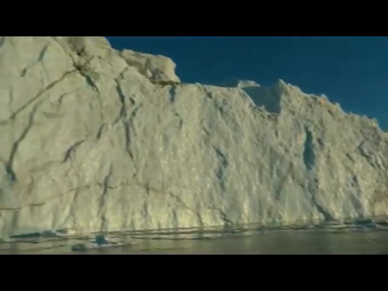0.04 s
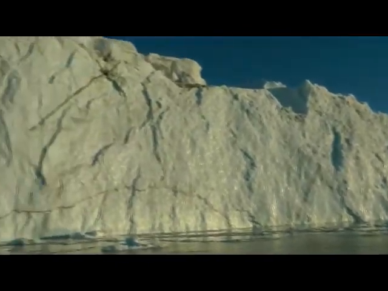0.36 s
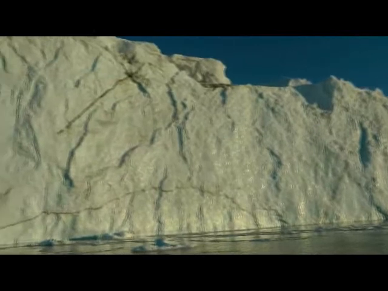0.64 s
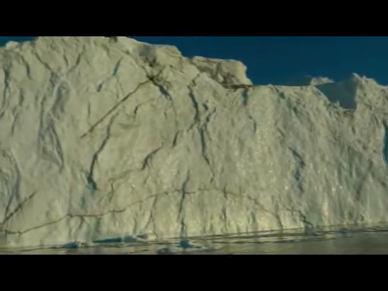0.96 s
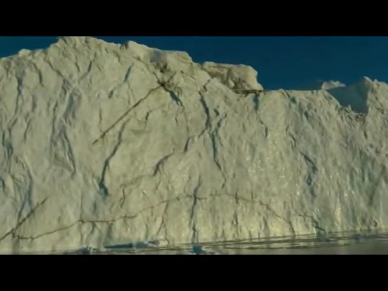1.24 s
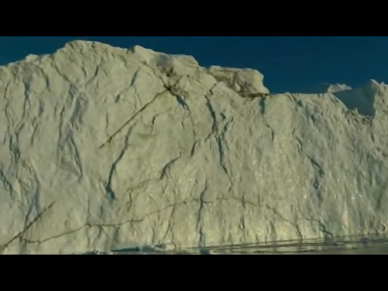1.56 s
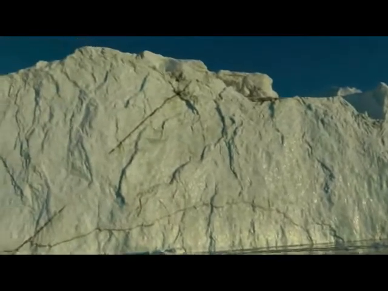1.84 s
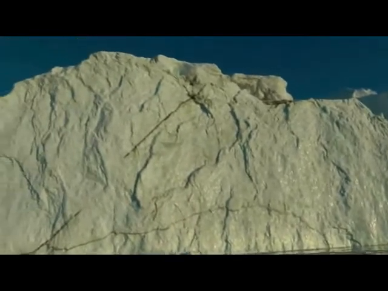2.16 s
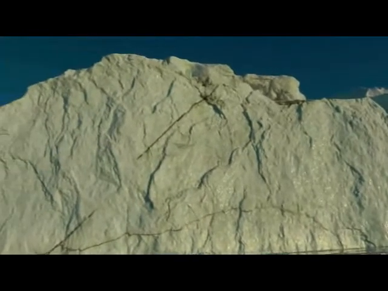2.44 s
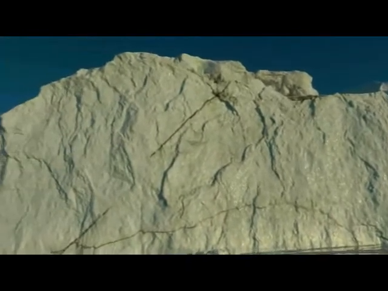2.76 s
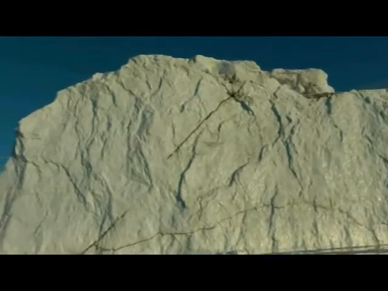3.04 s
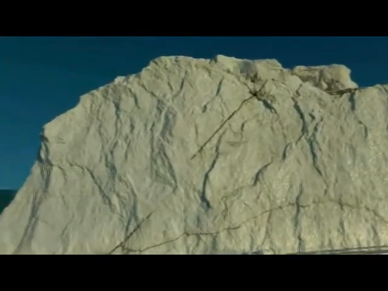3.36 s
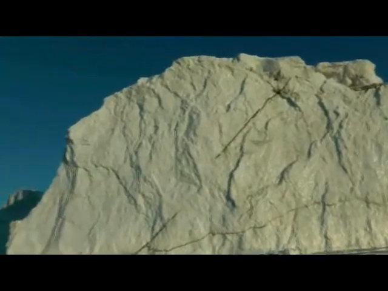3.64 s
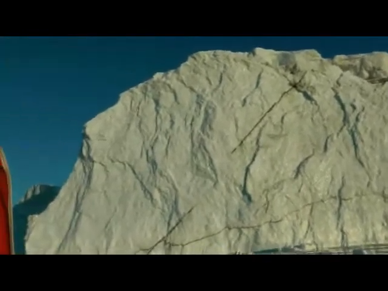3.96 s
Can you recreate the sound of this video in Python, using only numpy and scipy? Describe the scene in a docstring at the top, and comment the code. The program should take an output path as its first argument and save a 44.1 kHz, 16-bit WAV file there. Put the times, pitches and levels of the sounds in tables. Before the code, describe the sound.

Steady low boat engine rumble and clatter over wind, splashing wash and soft knocks.

```python
"""On a boat in calm, icy water, a diesel engine runs slowly and steadily under the deck.
The hull drones on the engine's orders and booms now and then. The engine clatters with each firing
and chuffs once a cycle over a rumble of wind and wash. Water fizzes alongside with bursting bubbles,
swishes of spray and a few crisp ticks, and soft blows ring dull knocks from the hull's panels."""
import sys
import numpy as np
from scipy import signal
from scipy.fft import rfft, irfft
from scipy.io import wavfile

SR = 44100
rng = np.random.default_rng(int(sys.argv[2]) if len(sys.argv) > 2 else 0)


def transcribe(signal):
    """Save signal, clipped to [-1, 1], as a 16-bit WAV file at the path in sys.argv[1]."""
    frames = np.atleast_2d(signal).T
    limited = np.clip(frames, -1, 1)
    pcm = np.round(limited * 32767).astype(np.int16)
    wavfile.write(sys.argv[1], SR, pcm)


N = 176400
T = np.arange(N) / SR
HZ = np.fft.rfftfreq(N, 1 / SR)
CYCLE_HZ, FIRINGS_PER_CYCLE = 5.836, 5


def amp(db):
    """Decibels to gain."""
    return 10 ** (np.asarray(db) / 20)


def unit(x):
    """Scales to rms 1."""
    return x / np.sqrt(np.mean(x ** 2) + 1e-20)


def db_at(points, hz=HZ):
    """Interpolates (Hz, dB) points on a log-frequency axis."""
    point_hz, db = np.transpose(points)
    return np.interp(np.log(hz + 1), np.log(point_hz + 1), db)


def level(points):
    """Gain over time from (s, dB) points."""
    return amp(np.interp(T, *np.transpose(points)))


def add(mix, start_s, sound):
    """Mixes a sound in at start_s."""
    part = mix[:, round(start_s * SR):][:, :sound.shape[-1]]
    part += sound[..., :part.shape[1]]


def drift(rate_hz):
    """Slow random motion of rms 1."""
    return unit(irfft(rfft(rng.standard_normal(N)) * np.exp(-(HZ / rate_hz) ** 2) * (HZ > 0), N))


def spread(pair, hz):
    """Unrelated pair to left and right: bass alike, midrange diffuse."""
    # Stereo width. Each row: frequency in Hz, side over mid in dB.
    side_over_mid = [(25, -17), (70, -21), (125, -28.5), (200, -29), (320, -21), (500, -12.5), (800, -7.5),
                     (1250, -2.5), (2000, -.5), (3200, -2), (4500, -8.5), (7000, -18), (9000, -5),
                     (12500, -5.5)]
    # Balance. Each row: frequency in Hz, right over left in dB.
    balance = [(100, 0.34), (300, 0.2), (600, 1.5), (1100, 2), (2200, 0), (5000, -1.5), (13000, 0)]
    width, lean = amp(db_at(side_over_mid, hz)), amp(db_at(balance, hz) / 2)
    mid, side = pair[0], pair[1] * width
    return np.array([(mid + side) / lean, (mid - side) * lean]) / np.sqrt(1 + width ** 2)


def colour(pair, spectrum):
    """Gives two unrelated signals a spectrum and a stereo image, at rms 1."""
    return unit(irfft(spread(rfft(pair), HZ) * amp(db_at(spectrum)), N))


def noise(spectrum):
    """Stereo noise of a given spectrum, at rms 1."""
    return colour(rng.standard_normal((2, N)), spectrum)


def hull_drone(cycles, order_count=340, size=8192):
    """The hull repeats one pattern of vibration every engine cycle."""
    # Strong engine orders. Each row: multiple of the cycle rate, level in dB.
    strong_orders = [(4, -67), (5, -62), (9, -58), (10, -53.5), (15, -46.5), (18, -51.5), (20, -38.5),
                     (22, -58), (25, -36), (27, -51), (30, -42), (32, -42.5), (35, -37), (36, -41),
                     (37, -45), (45, -37.5), (46, -51.5), (47, -36), (54, -44.5), (55, -49), (67, -48),
                     (122, -52.5), (198, -55.5)]
    # Weak orders between them. Each row: frequency in Hz, level per order in dB.
    weak_orders = [(40, -79), (70, -57), (130, -43.5), (180, -59.5), (260, -45.5), (380, -53.5),
                   (550, -59.5), (750, -61.5), (950, -70), (1200, -67), (2000, -83.5)]
    hz = np.arange(order_count) * CYCLE_HZ
    gain = amp(db_at(weak_orders, hz)) * (hz > CYCLE_HZ * FIRINGS_PER_CYCLE)
    for order, db in strong_orders:
        gain[round(order)] = amp(db)
    phasors = np.exp(2j * np.pi * rng.random((2, order_count)))
    one_cycle = irfft(spread(phasors, hz) * gain, size) * size / np.sqrt(2)
    return np.array([np.interp(cycles, np.arange(size) / size, side, period=1) for side in one_cycle])


def clatter(cycles, db=-45, decay_s=0.0058):
    """Two short bursts of mechanical noise per firing."""
    # Clatter spectrum. Each row: frequency in Hz, relative density in dB.
    spectrum = [(200, 12), (500, -5.5), (1000, 10.5), (2000, -1), (4000, -19), (8000, -18.5), (14000, -37)]
    bursts_per_cycle = 2 * FIRINGS_PER_CYCLE
    since_s = (cycles * bursts_per_cycle) % 1 / (CYCLE_HZ * bursts_per_cycle)
    return amp(db) * noise(spectrum) * unit(np.exp(-since_s / decay_s))


def rumble(base_db=-29, crossover_hz=183):
    """Wind and wash; the deep part heaves more than the rest."""
    # Rumble spectrum. Each row: frequency in Hz, relative density in dB.
    spectrum = [(20, -34), (40, -45), (65, -14), (100, -4.5), (135, 0), (175, -4.5), (255, -1), (300, -3),
                (370, -3), (500, -10.5), (700, -16.5), (950, -23), (1300, -25.5), (2000, -28.5),
                (3200, -38), (6000, -47), (14000, -82)]
    # Heave below and above the crossover. Each row: time in seconds, gain in dB.
    deep_gain = [(0, -8), (.2, -1.5), (.52, 2), (.7, -8), (.94, 5.5), (1.06, 2), (1.22, 2), (1.45, 6),
                 (1.65, -5), (1.9, 0), (2.15, -3), (2.38, 1.5), (2.5, -1), (3.0, -5), (3.07, -3), (3.3, 0),
                 (3.44, -6), (3.67, -3), (3.8, -19), (4, 3)]
    wash_gain = [(0, 1.5), (.2, 0), (.32, 1), (.41, -4.5), (.54, -0.5), (.75, -2.5), (1.12, 1), (1.3, -1),
                 (1.55, -0.5), (1.85, -0.5), (2.2, 1.5), (2.45, 0), (2.83, 0), (3.2, -.5), (3.8, -0.5),
                 (4, 3)]
    whole = amp(base_db + 0.5 * drift(rate_hz=4.2)) * noise(spectrum)
    deep = irfft(rfft(whole) / (1 + (HZ / crossover_hz) ** 8), N)
    return deep * level(deep_gain) + (whole - deep) * level(wash_gain)


def water_fizz(bubbles_per_s=280, bubbles_over_hiss_db=-11, scatter_db=7.5):
    """Fine fizz along the hull with tiny bursting bubbles in it."""
    # Fizz spectrum. Each row: frequency in Hz, relative density in dB.
    spectrum = [(300, 5.5), (1500, 8), (3000, 7), (4700, 3), (6500, -2), (9000, -1.5), (12500, -2),
                (14000, -16)]
    # Fizz strength. Each row: time in seconds, base level in dB.
    strength = [(0, -56.5), (.14, -51), (.3, -51.5), (.55, -54), (1.28, -54.5), (1.43, -50.5), (1.6, -52),
                (2.2, -53), (2.45, -50.5), (2.65, -53), (3.2, -52), (3.47, -53.5), (3.78, -54.5),
                (3.88, -50.5), (4, -55.5)]
    sizes = amp(scatter_db * np.minimum(rng.exponential(1, (2, N)), 4))
    signs = rng.choice([-1, 1], (2, N))
    bursts = rng.random((2, N)) < bubbles_per_s / SR
    bubbles = amp(bubbles_over_hiss_db) * colour(sizes * signs * bursts, spectrum)
    return (noise(spectrum) + bubbles) * level(strength) * amp(1.4 * drift(rate_hz=15))


def hull_knocks(rise_s=0.0038, roughness=0.83, half_width_ratio=0.21, size=8192):
    """Soft blows ring damped hull panels, each with a rough slap around its pitch."""
    # Blows. Each row: start in seconds, base level in dB, pitch in Hz, decay in seconds.
    blows = [(.008, -35, 600, .012), (.557, -19.5, 369.4, 0.017), (.658, -29.5, 530, 0.011),
             (.858, -29.5, 480, 0.025), (1.068, -34.5, 1287, 0.0074), (1.115, -23.5, 314, 0.037),
             (1.138, -28, 502, .016), (1.361, -23.5, 374, 0.022), (2.033, -27.5, 768, 0.017),
             (2.042, -43, 933, .014), (2.186, -22.5, 372.5, 0.026), (2.422, -27.5, 477, 0.032),
             (3.417, -21, 327, 0.013), (3.68, -20.5, 380, 0.0079), (3.874, -22, 384, 0.013),
             (3.915, -29.5, 522, 0.018)]
    t, hz = T[:size], np.fft.rfftfreq(size, 1 / SR)
    out = np.zeros((2, N))
    for start_s, db, pitch_hz, decay_s in blows:
        band = 1 / (1 + ((hz / pitch_hz - 1) / half_width_ratio) ** 2)
        slap = unit(irfft(rfft(rng.standard_normal((2, size))) * band))
        ring = np.sin(2 * np.pi * (pitch_hz * t + rng.random((2, 1))))
        envelope = np.minimum(t / rise_s, 1) * np.exp(-np.maximum(t - rise_s, 0) / decay_s)
        add(out, start_s, amp(db) * spread(ring + roughness * slap, pitch_hz) * envelope)
    return out


def hull_booms():
    """Low hull resonances swell and sink, making the rumble throb."""
    # Booms. Each row: peak time in seconds, peak level in dB, pitch in Hz, half length in seconds.
    swells = [(0.032, -27.5, 258, 0.039), (0.546, -23.5, 131, .05), (0.784, -19, 146.7, 0.027),
              (0.9, -25, 108.9, 0.026), (0.964, -20, 147, 0.024), (1.09, -28.5, 290, 0.042),
              (1.227, -24, 257, 0.023), (1.448, -21, 131, 0.031), (2.241, -21.5, 145, 0.021),
              (2.251, -20.5, 256, 0.017), (2.612, -22.5, 254, 0.026), (2.632, -21, 137.8, 0.024),
              (2.88, -24, 119.8, 0.028), (3.172, -20, 136, 0.021), (3.28, -24, 257.5, 0.031),
              (3.328, -25.5, 116.5, 0.034), (3.694, -23.5, 144.6, 0.043), (3.898, -23, 129.5, 0.021),
              (3.948, -23.5, 249, 0.029)]
    out = np.zeros(N)
    for peak_s, db, pitch_hz, half_s in swells:
        envelope = np.exp(-((T - peak_s) / half_s) ** 2)
        out += amp(db) * envelope * np.sin(2 * np.pi * (pitch_hz * T + rng.random()))
    return out


def spray(rise_s=0.012):
    """Bright swishes of spray rise quickly and die away."""
    # Swishes. Each row: start in seconds, level in dB, decay in seconds.
    swishes = [(.1, -62, .08), (1.305, -55, 0.041), (1.475, -49, .045), (2.11, -49, 0.018),
               (2.492, -48, 0.034), (2.84, -52, 0.13), (3.02, -52.5, 0.16), (3.35, -56, .025),
               (3.532, -50, 0.027), (3.825, -50, 0.034)]
    # Spray spectrum. Each row: frequency in Hz, relative density in dB.
    spectrum = [(1000, 0), (4000, -1), (7000, -6), (11500, 0.5), (14000, -3.5)]
    envelope = np.zeros(N)
    for start_s, db, decay_s in swishes:
        rise = np.clip((T - start_s) / rise_s, 0, 1)
        envelope += amp(db) * rise * np.exp(-np.maximum(T - start_s - rise_s, 0) / decay_s)
    return noise(spectrum) * envelope


def chuff(first_s=0.1072, rise_s=0.0032, hold_s=0.017, decay_s=0.014):
    """Once per engine cycle: a metallic clack, then a hissing puff."""
    # Puff spectrum. Each row: frequency in Hz, relative density in dB.
    spectrum = [(300, -26), (1000, 2), (1400, 6), (1900, 11), (2600, 4.5), (3600, -10.5), (5000, -5),
                (7000, -12.5), (13000, -13)]
    # Chuff strength. Each row: time in seconds, base level in dB.
    strength = [(0, -47), (.63, -45.5), (.97, -48.5), (1.31, -43.5), (1.5, -47), (1.67, -48.5), (2, -45.5),
                (2.2, -47.5), (2.7, -45.5), (3.2, -45.3), (3.37, -43.5), (3.71, -44), (4, -55)]
    clack_hz, half_width_hz, clack_over_puff_db, clack_decay_s = 2300, 950, 6, 0.0045
    since_s = (T - first_s) % (1 / CYCLE_HZ)
    envelope = np.minimum(since_s / rise_s, 1) * np.exp(-np.maximum(since_s - hold_s, 0) / decay_s)
    puff = noise(spectrum) * envelope * amp(drift(rate_hz=170))
    resonance = 1 / (1 + ((HZ - clack_hz) / half_width_hz) ** 2)
    white = spread(rfft(rng.standard_normal((2, N))), HZ)
    clack = unit(irfft(white * resonance, N)) * np.exp(-since_s / clack_decay_s)
    return (puff + amp(clack_over_puff_db) * clack) * level(strength)


def ticks(side_gain=0.26, size=2048):
    """Tiny cracks, each a noise burst through one broad resonance."""
    # Each row: start in seconds, peak level in dB, centre and half-width in Hz, decay in seconds.
    cracks = [(.216, -41.5, 10000, 8000, 0.011), (.2229, -32, 11000, 4000, .0005),
              (0.2295, -24, 10100, 1900, 0.0005), (0.2293, -34, 4100, 2000, 0.00065),
              (0.2381, -36.5, 3580, 1100, 0.0012), (.244, -40, 9500, 4000, 0.00089),
              (0.2655, -30, 8500, 8000, 0.00047), (0.2656, -37, 4400, 2000, 0.00044),
              (2.524, -34.5, 3840, 1100, 0.0012), (2.5238, -35, 2500, 600, .0013),
              (2.755, -43, 10200, 1200, 0.001), (2.801, -41.5, 8350, 2500, .001),
              (3.827, -47, 6000, 4000, .003), (3.855, -37, 2010, 500, 0.0083),
              (3.8555, -40, 4900, 2200, 0.0022), (3.906, -51, 6500, 4000, 0.0018),
              (3.948, -40.5, 1980, 900, 0.0053), (3.947, -47, 4200, 1600, 0.0055)]
    hz = np.fft.rfftfreq(size, 1 / SR)
    out = np.zeros((2, N))
    for start_s, db, centre_hz, half_width_hz, decay_s in cracks:
        fade = np.exp(-T[:size] / decay_s)
        burst = rng.standard_normal((2, size)) * fade
        resonance = 1 / (1 + 0.5j * (hz ** 2 - centre_hz ** 2) / (half_width_hz * hz + 1)) ** 2
        mid, side = unit(irfft(rfft(burst) * resonance))
        gain = amp(db) * np.sqrt(np.mean(fade ** 2))
        add(out, start_s, gain * (mid + side_gain * np.array([side, -side])))
    return out


def scene(wander_rms_s=0.00019, low_cut_hz=83):
    """Engine, wind and water, with ticks and knocks on top."""
    cycles = CYCLE_HZ * (T + wander_rms_s * drift(rate_hz=1.0))  # runs slightly ahead or behind
    low_cut = signal.butter(2, low_cut_hz, "high", fs=SR, output="sos")
    hits = signal.sosfilt(low_cut, ticks() + hull_knocks())
    engine = hull_drone(cycles) + clatter(cycles) + chuff()
    return engine + rumble() + hull_booms() + water_fizz() + spray() + hits


def record(dry):
    """A steep low-pass removes the highest treble."""
    cutoff_hz = 13450
    low_pass = signal.firwin(511, cutoff_hz, window=("kaiser", 9), fs=SR)
    return signal.oaconvolve(dry, low_pass[None], "same")


dry = scene()
out = record(dry)
transcribe(out)
```